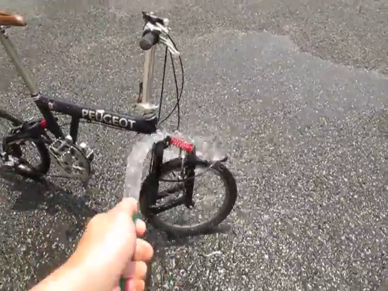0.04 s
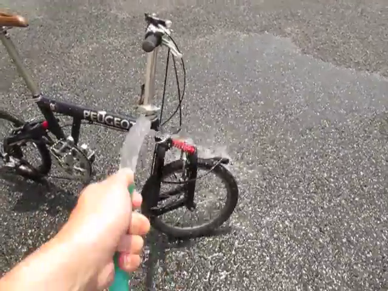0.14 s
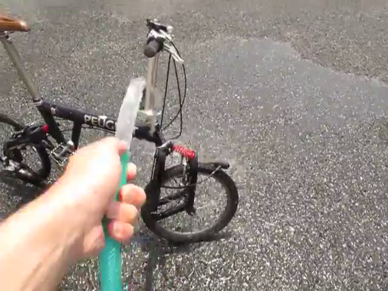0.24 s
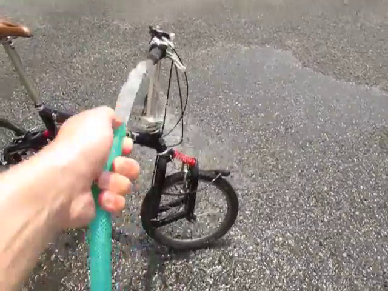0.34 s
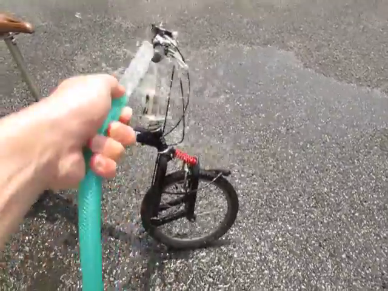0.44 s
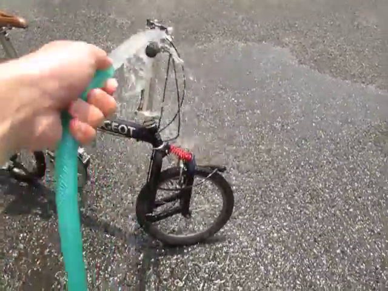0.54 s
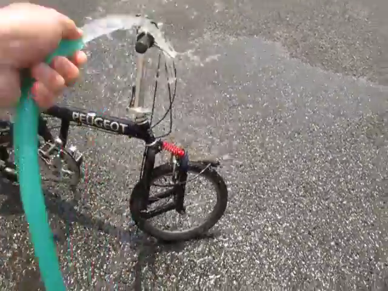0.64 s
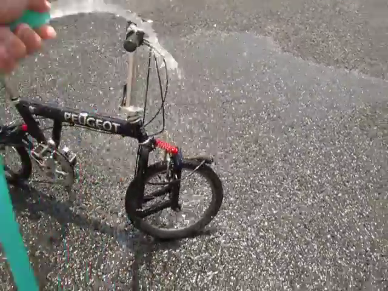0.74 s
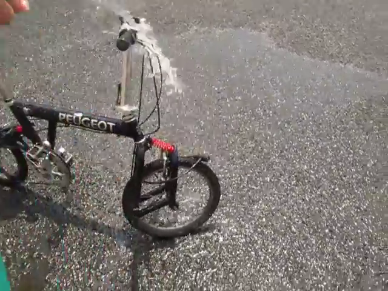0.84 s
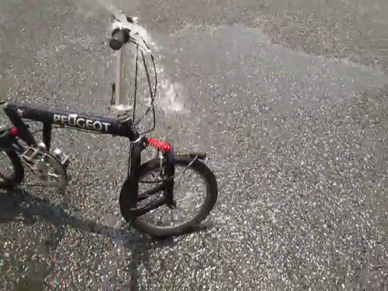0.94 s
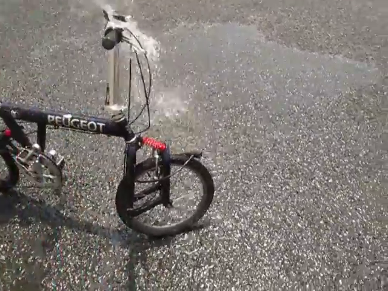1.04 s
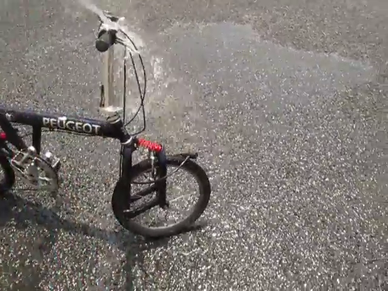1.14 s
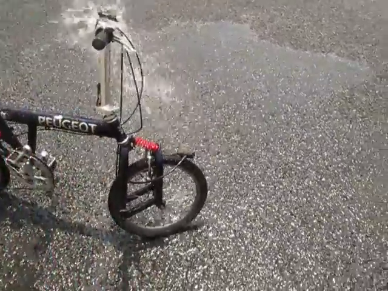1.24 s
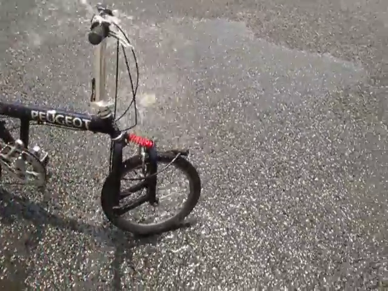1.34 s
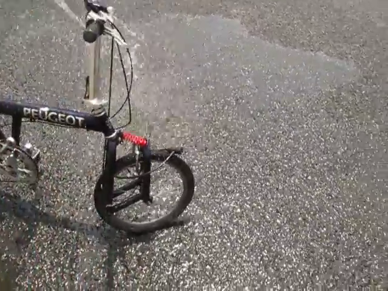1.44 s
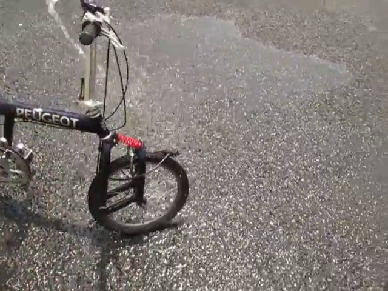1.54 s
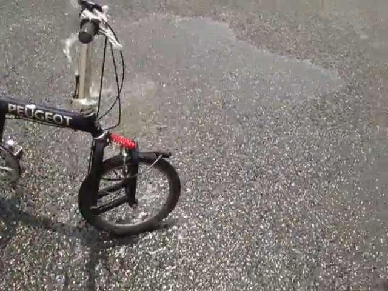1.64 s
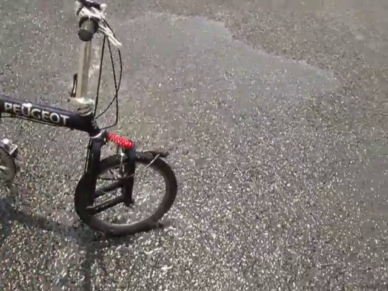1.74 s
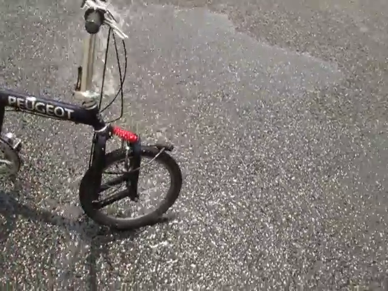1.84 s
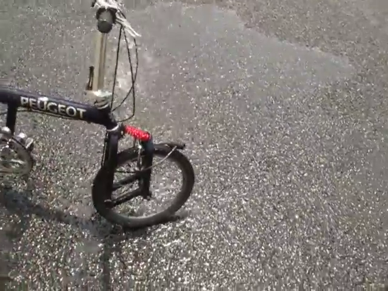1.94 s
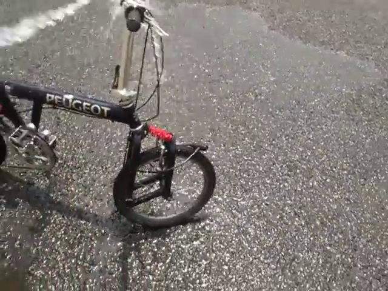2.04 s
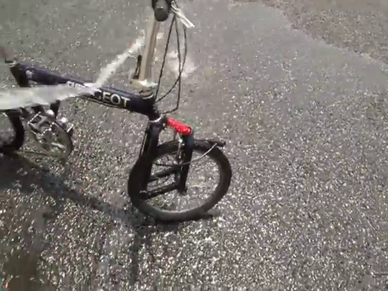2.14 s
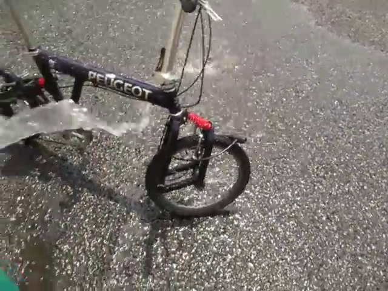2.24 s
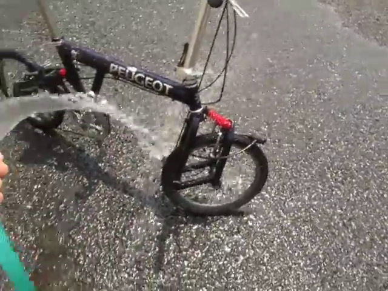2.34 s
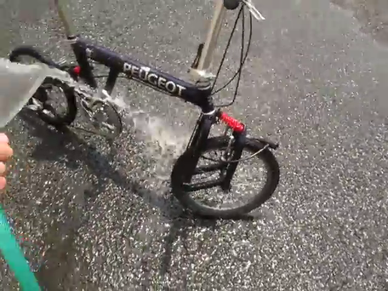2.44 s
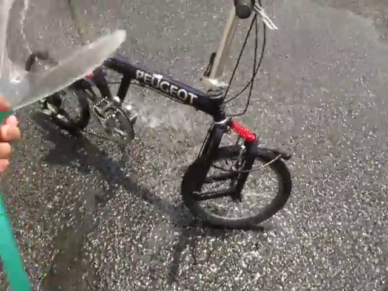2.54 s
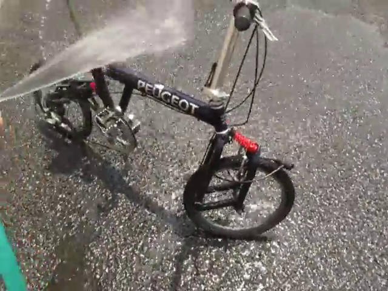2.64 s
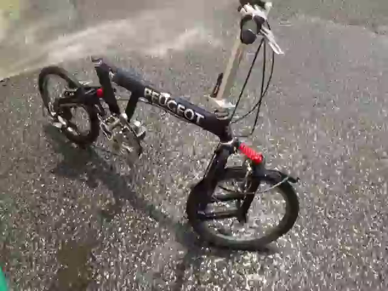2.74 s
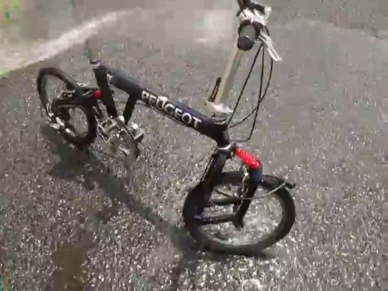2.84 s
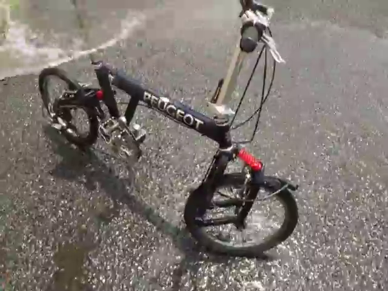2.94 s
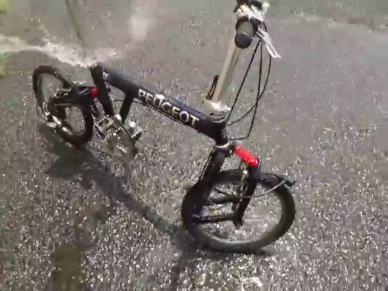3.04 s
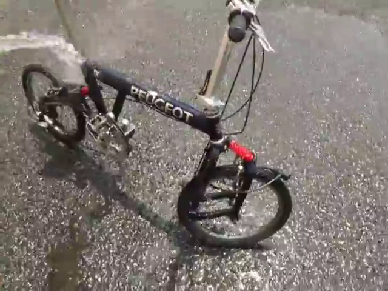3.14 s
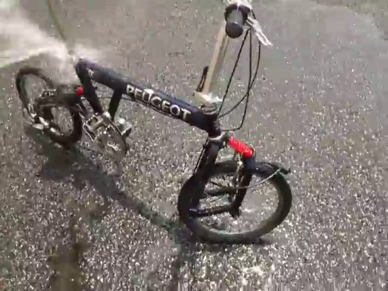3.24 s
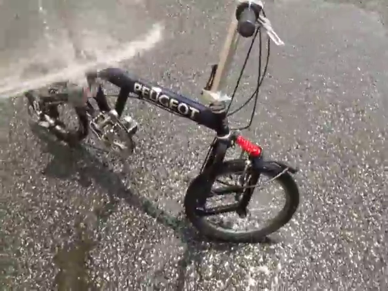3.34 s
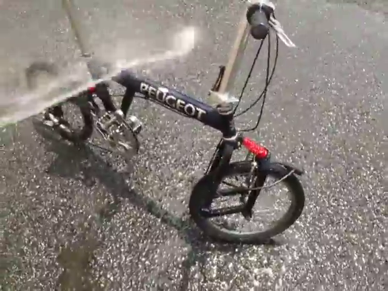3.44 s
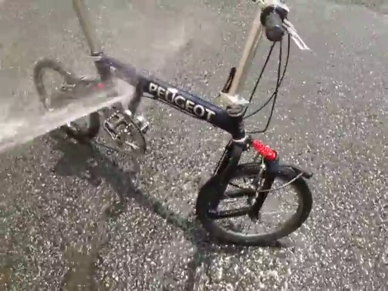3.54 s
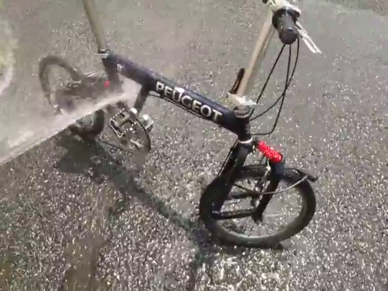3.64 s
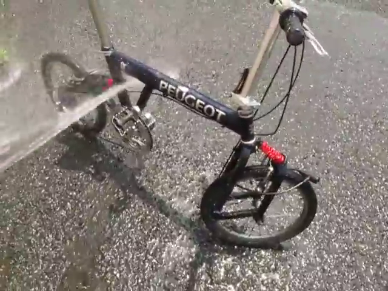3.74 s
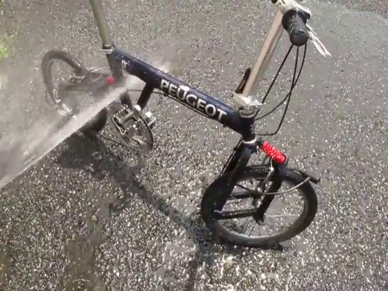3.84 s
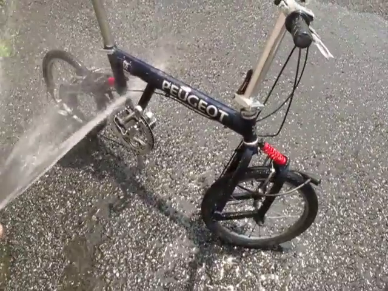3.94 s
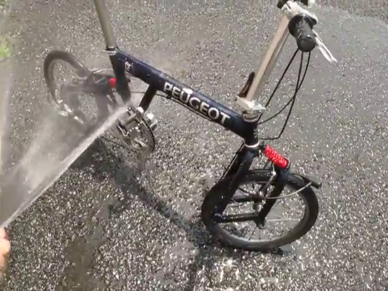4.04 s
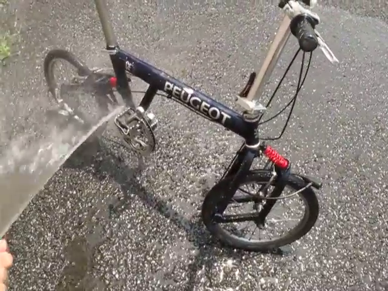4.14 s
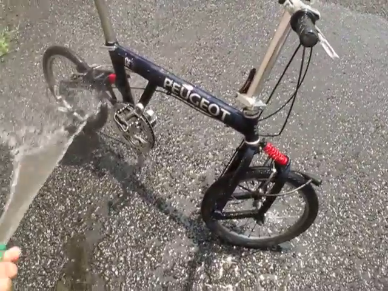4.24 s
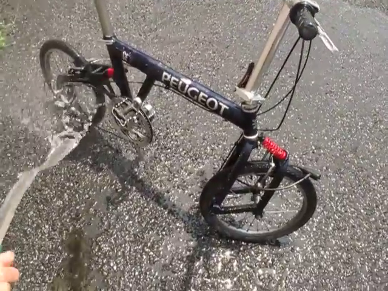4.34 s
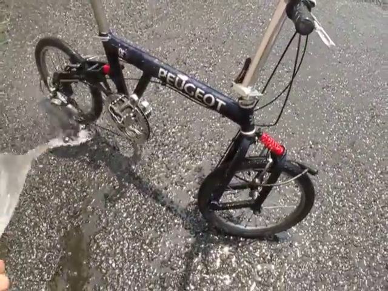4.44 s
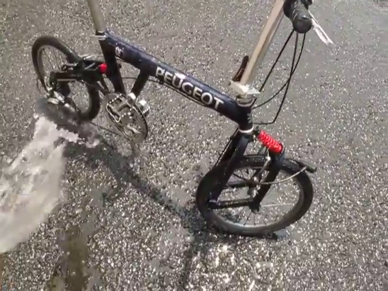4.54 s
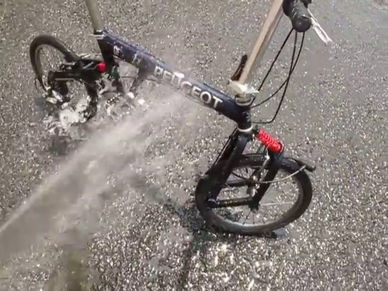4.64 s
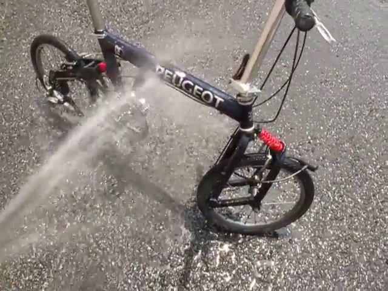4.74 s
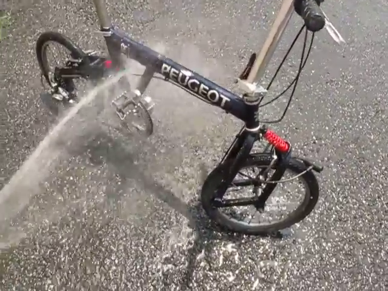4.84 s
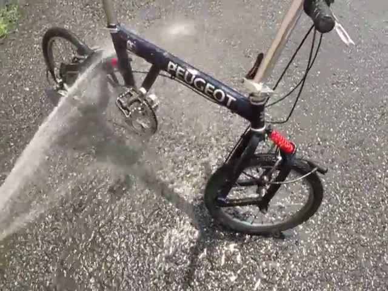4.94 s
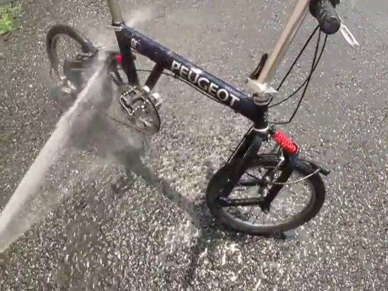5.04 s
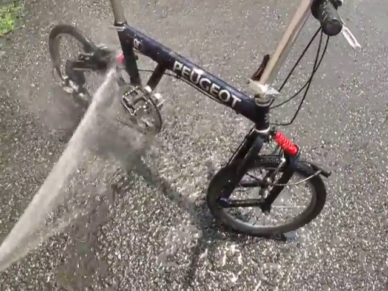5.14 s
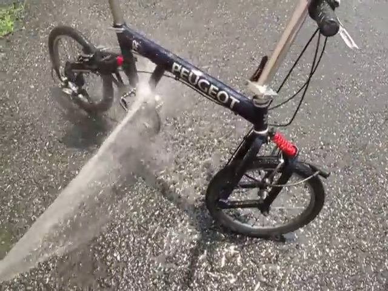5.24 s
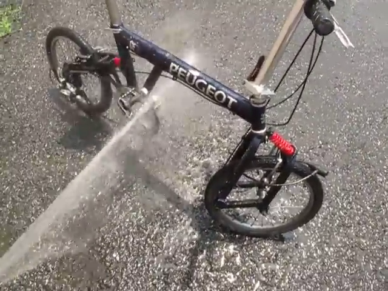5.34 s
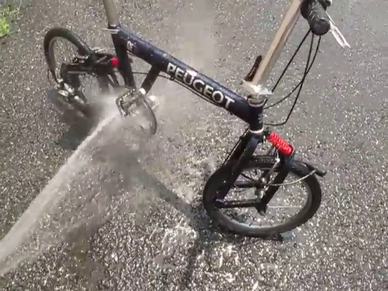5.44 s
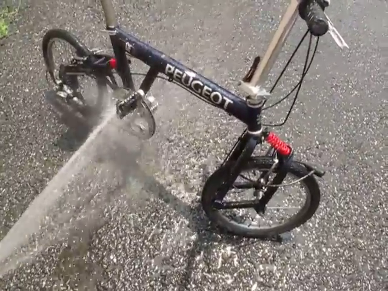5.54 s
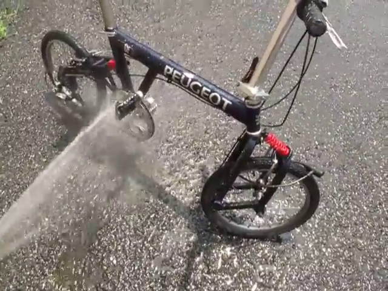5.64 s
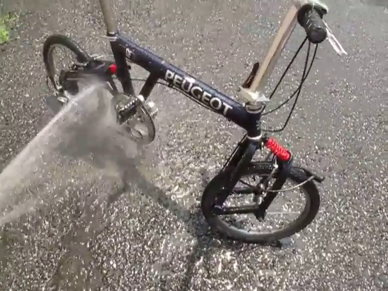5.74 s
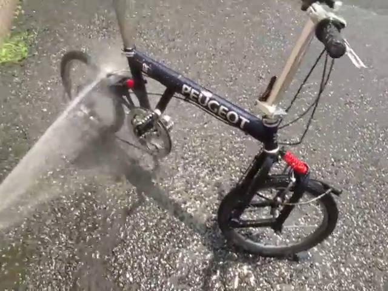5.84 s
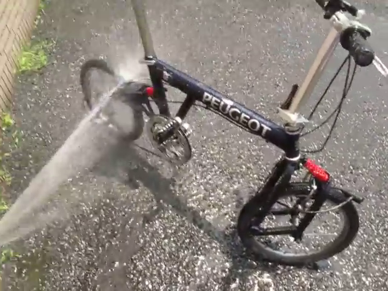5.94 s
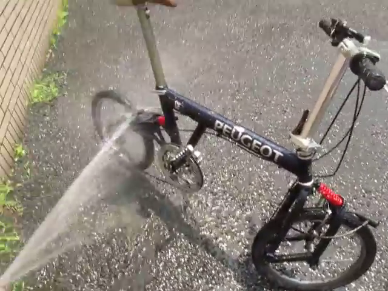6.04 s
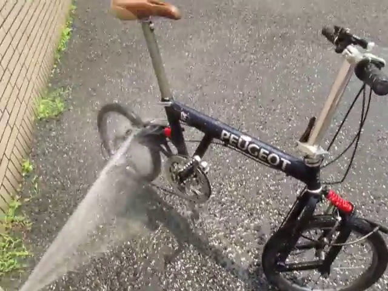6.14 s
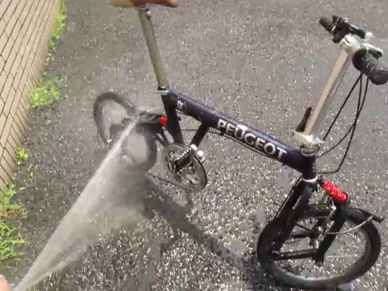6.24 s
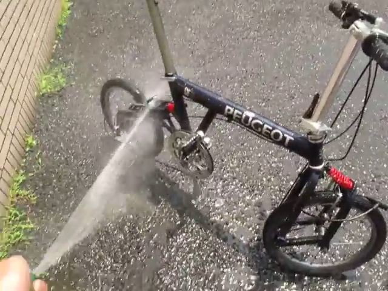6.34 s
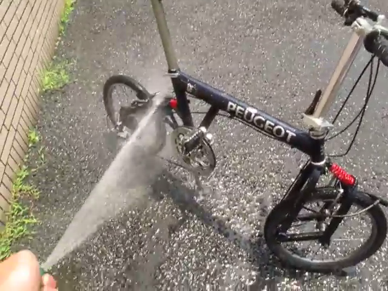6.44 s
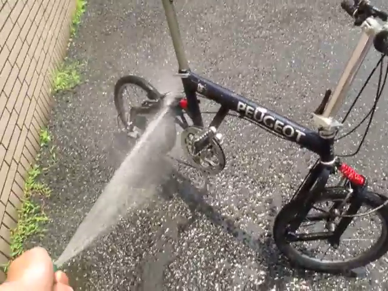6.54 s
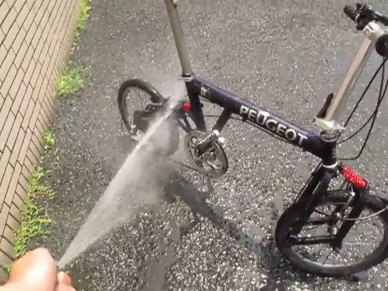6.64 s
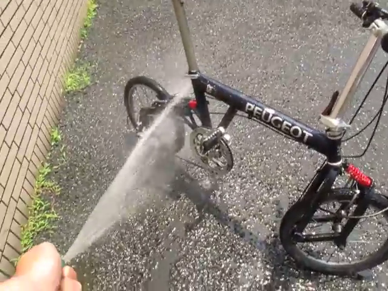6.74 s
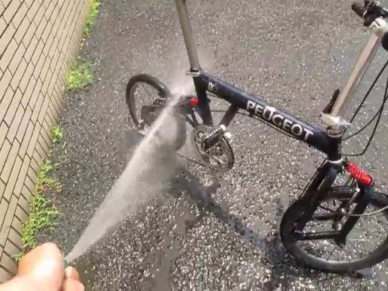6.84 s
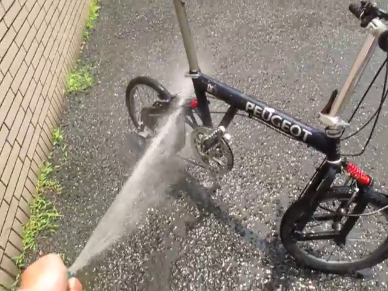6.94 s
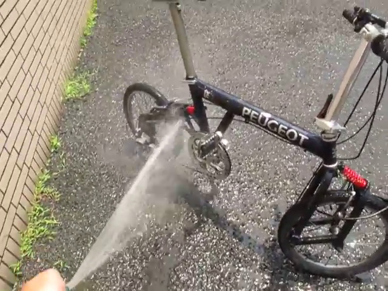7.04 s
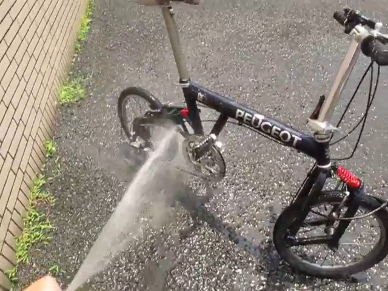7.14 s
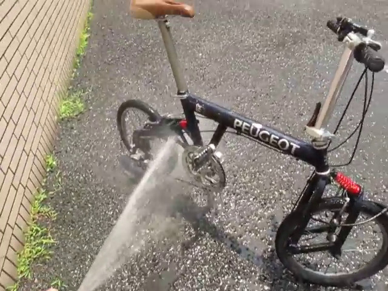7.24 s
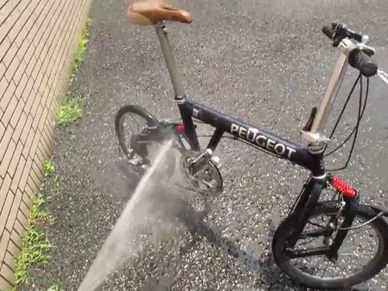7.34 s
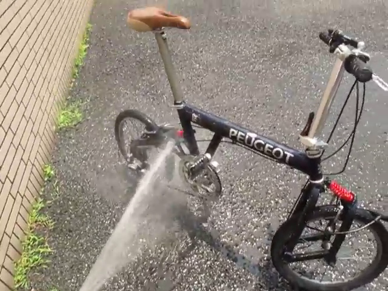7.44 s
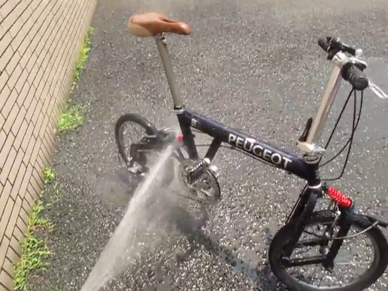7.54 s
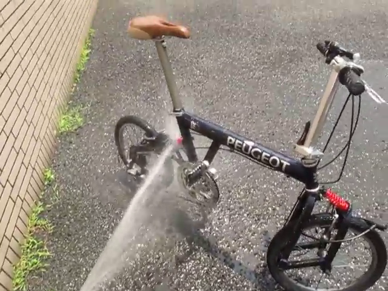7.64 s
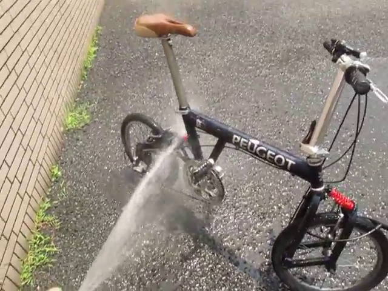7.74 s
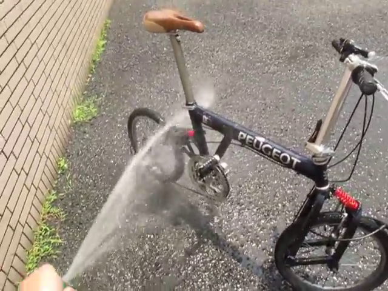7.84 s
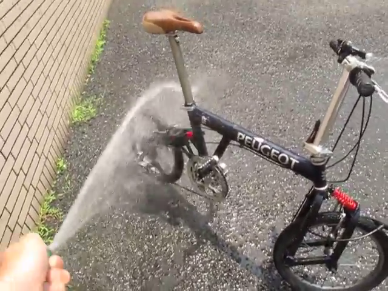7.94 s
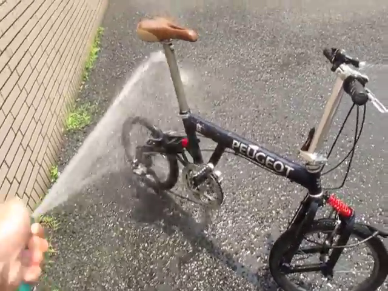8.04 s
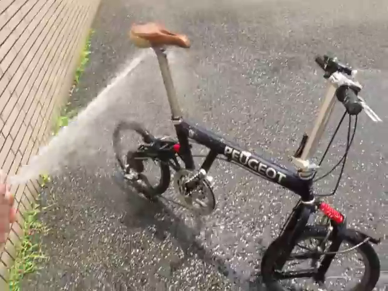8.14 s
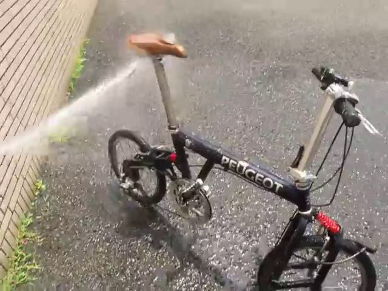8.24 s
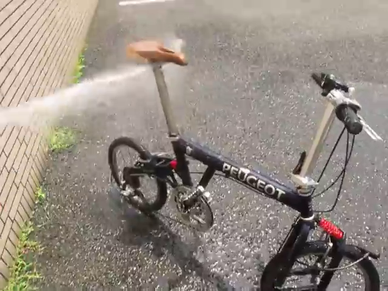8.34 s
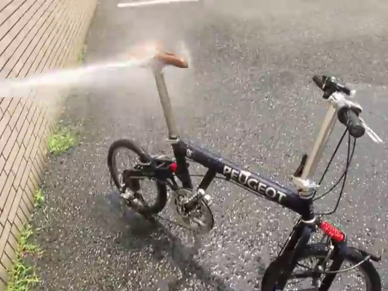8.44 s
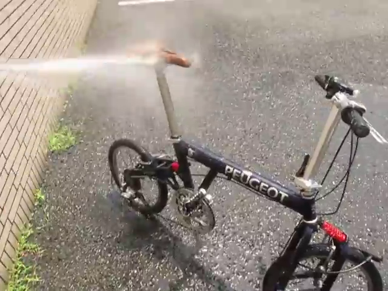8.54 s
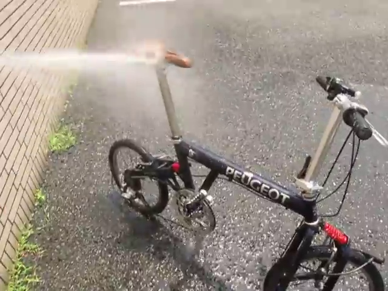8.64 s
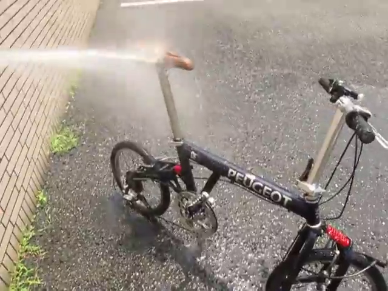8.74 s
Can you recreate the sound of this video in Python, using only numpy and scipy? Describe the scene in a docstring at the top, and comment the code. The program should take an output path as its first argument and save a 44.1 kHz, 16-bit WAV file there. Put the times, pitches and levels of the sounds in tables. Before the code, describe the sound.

A garden hose sprays a bicycle on wet asphalt, loose watery slaps turning to bright hissing spatter, finally drumming on the hollow saddle.

```python
"""Water bursts and patters throughout: a garden hose plays over a bicycle on wet asphalt, beside a quiet street.
A loose stream slaps in blobs; pinched by a thumb it hits more often and hisses. Both are made of random impacts,
turned into short decaying tones and bursts of noise. The jet drums on the frame, tyre, spokes and mudguard, and at
last the saddle, each a set of resonances. Run-off, puddles, breeze and street are filtered impacts, noise and hum."""
import sys
import numpy as np
from scipy import signal
from scipy.io import wavfile
from scipy.ndimage import uniform_filter1d

SR = 44100
rng = np.random.default_rng(int(sys.argv[2]) if len(sys.argv) > 2 else 0)


def bounce(signal):
    """Save signal as a 16-bit WAV file at the path given by the first command-line argument."""
    frames = np.transpose(np.atleast_2d(signal))
    limited = np.clip(frames, -1, 1)
    pcm = np.round(limited * 32767).astype(np.int16)
    wavfile.write(sys.argv[1], SR, pcm)


N = 387198
TIME = np.arange(N) / SR


def amp(db):
    """Decibels to gain."""
    return 10 ** (np.asarray(db) / 20)


def evened(x):
    """Scales to rms 1."""
    return x / np.sqrt(np.mean(x ** 2) + 1e-20)


def steadied(x, size=2200):
    """Holds the short-time rms near 1: a hose delivers water at an even rate."""
    power = abs(uniform_filter1d(uniform_filter1d(x ** 2, size), size))
    return x / np.sqrt(power + 1e-4 * np.mean(x ** 2))


def curve(rows, column=1):
    """One column of a table, joined by straight lines in time."""
    rows = np.asarray(rows)
    return np.interp(TIME, rows[:, 0], rows[:, column])


def add(mix, s, sound):
    """Adds a sound to the mix at a time in seconds."""
    part = mix[max(round(s * SR), 0):][:len(sound)]
    part += sound[:len(part)]


def colour(x, points, size=4096):
    """Causal filter with the given spectrum, so that clicks keep their sharp front."""
    hz, db = np.transpose(points)
    bins_hz = abs(np.fft.fftfreq(size, 1 / SR)) + 1
    log_gain = np.log(amp(np.interp(np.log(bins_hz), np.log(hz), db)))
    taps = np.fft.ifft(np.exp(np.conj(signal.hilbert(log_gain)))).real
    return signal.oaconvolve(x, taps[:size // 2])[:N]


def ring(x, modes):
    """Passes x through a set of damped resonances."""
    out = np.zeros(N)
    for hz, width, db in modes:
        r = np.exp(-np.pi * width / SR)  # a wider resonance dies sooner
        pole = r * np.exp(2j * np.pi * hz / SR)
        out += amp(db) * signal.lfilter([1 - r], [1, -pole], x).real
    return out


def noise():
    """Steady white noise."""
    return rng.standard_normal(N)


def signs():
    """A random plus or minus for every sample: impacts push or pull."""
    return rng.choice([-1, 1], N)


def drops(per_s, spread_db):
    """Impacts at random moments: many small, a few large."""
    size_db = spread_db * np.minimum(rng.exponential(1, N), 3.5)
    return (rng.random(N) < per_s / SR) * amp(size_db)


def linger(x, seconds):
    """Lets each impulse die away exponentially."""
    r = np.exp(-1 / (seconds * SR))
    return signal.lfilter([1 - r], [1, -r], x)


def wander(seconds):
    """A smooth random curve of rms 1."""
    return evened(linger(linger(noise(), seconds), seconds))


def swells(rows, steady_db):
    """Gain of a steady flow with smooth swells on top."""
    power = amp(steady_db) ** 2
    for s, length, db in rows:
        progress = np.clip((TIME - s) / length, 0, 1)
        power = power + (amp(db) * np.sin(np.pi * progress)) ** 2
    return np.sqrt(power)


def contact(rows, column=2, build_s=0.0049, drain_s=0.029, glancing_db=-2):
    """Gain while the jet crosses a part: it builds, is fullest halfway, and drains after the row's length."""
    power = np.zeros(N)
    for row in rows:
        start, length = row[:2]
        t = TIME[:round((length + 10 * drain_s) * SR)]
        off_centre = (2 * np.minimum(t / length, 1) - 1) ** 2
        envelope = np.minimum(t / build_s, 1) * np.exp(-np.maximum(t - length, 0) / drain_s)
        add(power, start, (amp(row[column] + glancing_db * off_centre) * envelope) ** 2)
    return np.sqrt(power)


def glance(x, delay_s, strength=0.3, sway_s=0.121):
    """An echo from a surface beside the impact; its delay sways with the aim and shifts the hiss's colour."""
    late = TIME - delay_s * np.exp(0.2 * wander(sway_s))
    # a wet, rough surface reflects only weakly
    return (x + strength * np.interp(late, TIME, x)) / np.sqrt(1 + strength ** 2)


# Hum of a distant machine. Each row: pitch in Hz, level in dB before the fade is added.
HUM = [(42, -68.5), (200, -63)]
# Its fade as the microphone turns away. Each row: time in seconds, change of level in dB.
HUM_FADE = [(0, 0.5), (2.5, 0.5), (4.5, -5.5), (6, -13)]


def hum():
    """Low sine tones whose pitch drifts by about 3 Hz."""
    drift, tones_sum = wander(0.045), np.zeros(N)
    for hz, db in HUM:
        turns = np.cumsum(hz + 3 * drift) / SR
        tones_sum += amp(db) * evened(np.sin(2 * np.pi * turns))
    return amp(curve(HUM_FADE)) * tones_sum


# Colour of the street rumble. Each row: frequency in Hz, relative strength in dB per Hz.
STREET = [(60, -11.5), (130, -5.5), (250, -5), (450, -8.5), (800, -12), (2000, -27), (8000, -48)]


def street():
    """The steady rumble of the street: noise, strongest in the bass."""
    return amp(-56.5) * evened(colour(noise(), STREET))


# Colour of the breeze. Each row: frequency in Hz, relative strength in dB per Hz.
BREEZE = [(15, -14), (28, -2.5), (42, 5), (70, -4.5), (130, -14), (300, -32), (2000, -60)]
# Gusts on the microphone. Each row: start in seconds, length in seconds, level at the fullest in dB.
GUSTS = [(3.4, 2.2, -63), (6.1, .55, -52), (7.7, 0.6, -55)]


def breeze():
    """Very low noise from moving air, steady with gusts on top."""
    return swells(GUSTS, steady_db=-59.5) * evened(colour(noise(), BREEZE, size=16384))


# Colour of the run-off. Each row: frequency in Hz, relative strength in dB per Hz.
RUNOFF = [(100, -18), (400, -5), (1000, -5), (2000, 3.5), (4000, 3), (9000, -11.5), (12000, 2),
          (16000, -10)]


def runoff():
    """Run-off patters on the asphalt: thousands of small impacts a second."""
    return amp(-47.0) * evened(colour(drops(3000, spread_db=3.5) * signs(), RUNOFF))


# Run-off pouring into puddles. Each row: start in seconds, length in seconds, level at the fullest in dB.
POURS = [(2.5, 0.47, -52.5), (3.2, 0.67, -49), (5.0, 0.85, -51.5), (6.6, 0.44, -49), (7.8, .8, -49)]


def puddles():
    """A steady trickle with fuller pours: impacts with a low, plopping colour."""
    plop = [(100, -14.5), (260, -2), (450, -0.5), (620, -6), (850, 0.0), (2000, -13.5), (8000, -57)]  # Hz, dB
    return swells(POURS, steady_db=-55) * evened(colour(drops(1200, spread_db=4.0) * signs(), plop))


# Stray drops that knock on something hard close by. Each row: time in seconds, peak level in dB.
KNOCKS = [(3.476, -25), (3.844, -19), (5.78, -37)]


def knocks(decay_s=0.00075, size=600):
    """A stray drop knocks close by: a dull push, which swings back and dies away."""
    u, out = np.arange(size) / SR / decay_s, np.zeros(N)
    for s, db in KNOCKS:
        add(out, s, amp(db) * (1 - u) * np.exp(-u))
    return out


# Gurgles and whistles of the water. Each row: start in seconds, length in seconds, pitch in Hz,
# level at the fullest in dB.
TONES = [(0.492, 0.087, 4930, -40.5), (1.385, 0.3, 4020, -53), (3.188, .014, 3230, -32),
         (3.414, 0.011, 3500, -32), (3.452, 0.079, 2195, -35), (3.495, 0.058, 1950, -37)]


def tones(waver_hz=45, waver_s=0.001):
    """Brief fuzzy sine tones that waver in pitch, swell and fade."""
    out, waver = np.zeros(N), waver_hz * wander(waver_s)
    for s, length, hz, db in TONES:
        turns = np.cumsum(hz + waver[round(s * SR):][:max(round(length * SR), 8)]) / SR
        swell = signal.windows.hann(len(turns))
        add(out, s, amp(db) * swell * np.sqrt(2) * np.sin(2 * np.pi * turns))
    return out


def drumming(aim, modes, per_s, spread_db, crack=0.25):
    """The jet beats on a ringing part while it is aimed at it; each beat starts with a crack."""
    blows = drops(per_s, spread_db) * signs()
    cracks = colour(blows, [(500, 7), (3000, 6), (9000, -21), (15000, -28)])  # Hz, dB
    beats = evened(ring(blows, modes)) + crack * evened(cracks)
    # a small part radiates little below its lowest mode
    low_cut = signal.butter(3, 0.94 * modes[0][0], "high", fs=SR, output="sos")
    beats = signal.sosfilt(low_cut, beats)
    return contact(aim, build_s=0.03, drain_s=0.039) * steadied(beats)


# Jet on the frame. Each row: start in seconds, length in seconds, level at the fullest in dB.
ON_FRAME = [(1.645, 0.057, -36.5), (1.815, 0.046, -38.5), (2.095, 0.055, -43), (2.68, 0.18, -46),
            (4.71, 0.054, -41), (5.125, 0.076, -35.5), (5.37, .41, -44.5), (6.45, 1.29, -45.5)]
# What the frame rings with. Each row: pitch in Hz, width in Hz, relative level in dB.
FRAME = [(830, 150, -1.7), (1020, 270, 0.26), (1640, 240, -1), (1910, 180, -1)]


def frame():
    """The frame rings in a few broad resonances that die quickly."""
    return drumming(ON_FRAME, FRAME, per_s=400, spread_db=2)


# Jet on the rear tyre. Each row: start in seconds, length in seconds, level at the fullest in dB.
ON_TYRE = [(5.835, 0.46, -37), (6.275, 0.095, -34)]
# What the tyre rings with. Each row: pitch in Hz, width in Hz, relative level in dB.
TYRE = [(425, 32, 2), (810, 100, -17), (984, 95, -0.5), (1150, 150, -0.5), (1900, 300, -0.5),
        (2190, 200, -2), (3090, 100, -10)]


def tyre():
    """The hollow tyre answers dense, even blows, with a low resonance at the bottom."""
    return drumming(ON_TYRE, TYRE, per_s=2500, spread_db=1.5)


# Jet on the spokes. Each row: start in seconds, length in seconds, level at the fullest in dB.
ON_SPOKES = [(5.05, .2, -38), (6.5, .12, -34), (7.0, 0.08, -31.5), (7.33, .38, -31)]
# What the spokes ring with. Each row: pitch in Hz, width in Hz, relative level in dB.
SPOKES = [(5500, 290, 10), (5630, 300, -1), (6250, 240, -22), (7800, 500, 3)]


def spokes():
    """The spokes ring high under very uneven blows."""
    return drumming(ON_SPOKES, SPOKES, per_s=1100, spread_db=11)


# Jet on the mudguard. Each row: start in seconds, length in seconds, level at the fullest in dB.
ON_MUDGUARD = [(7.41, 0.2, -33.5)]
# What the mudguard rings with. Each row: pitch in Hz, width in Hz, relative level in dB.
MUDGUARD = [(846, 40, -3), (1376, 34, -1), (1920, 50, -7), (2500, 120, -7.5), (3110, 110, -10)]


def mudguard():
    """The mudguard rings longest in its two lowest, narrow resonances."""
    return drumming(ON_MUDGUARD, MUDGUARD, per_s=940, spread_db=4.0)


# Jet on the saddle. Each row: start in seconds, length in seconds, level at the fullest in dB.
ON_SADDLE = [(8.21, 0.11, -38.5), (8.395, .16, -22.5), (8.58, 0.23, -22.5)]
# What the saddle rings with. Each row: pitch in Hz, width in Hz, relative level in dB.
SADDLE = [(827, 55, 0.5), (910, 125, 3), (1276, 46, 8), (1560, 88, 4), (1740, 150, 8.5), (2110, 91, 10.5),
          (2520, 120, 8.5), (2940, 130, 6.5), (3360, 55, 7.5), (3890, 97, -5), (4270, 55, -14)]


def saddle():
    """The hollow saddle drums in many resonances at once."""
    return drumming(ON_SADDLE, SADDLE, per_s=990, spread_db=1.5)


def slap(hz, echo_s, cycles=0.75, echo=0.35, size=700):
    """One blob flattens: a pressure spike, a few dying cycles, and its echo from the asphalt; energy 1."""
    t = np.arange(size) / SR
    pulse = np.exp(-t * hz / cycles) * np.cos(2 * np.pi * hz * t)
    pulse = pulse + echo * np.interp(t - echo_s, t, pulse, left=0)
    return pulse / np.linalg.norm(pulse)


def snaps(per_s=70, size_db=10):
    """Now and then a fast drop meets a bare surface with one very short crack."""
    cracks = signs() * drops(per_s, spread_db=3.5)
    return amp(size_db) * colour(cracks, [(200, -24), (1000, -15.5), (3000, 1), (10000, -21), (15000, -16)])


# Colour of splashing water. Each row: frequency in Hz, relative strength in dB per Hz.
SPLASH = [(100, -58), (400, -19.5), (1000, -15.5), (1700, -15.5), (2500, -8.5), (4000, -6), (6000, -2),
          (8000, 0.36), (10200, 1.5), (13000, -14), (15800, -25.5)]


def splashing(hits, pinch, patchy_db=4):
    """Each impact bursts into droplets with a colour of its own; more droplets fall back after it."""
    edges_hz = [100, 3000, 5500, 8500, 11500, 17000]
    bands = []
    for band in zip(edges_hz, edges_hz[1:]):
        patchy = amp(patchy_db * rng.uniform(-np.sqrt(3), np.sqrt(3), N))
        power = (hits * patchy) ** 2
        burst = linger(power, 0.00098) + 0.43 * linger(power, 0.007)
        band_pass = signal.butter(3, band, "band", fs=SR, output="sos")
        bands.append(signal.sosfilt(band_pass, np.sqrt(burst) * noise()))
    mist = amp(5 * (pinch + 0.5)) * bands[-1]  # a faster jet makes finer, brighter droplets
    ticks = drops(1300, spread_db=5.5) * signs()  # single droplets on a hard surface
    spray = colour(evened(sum(bands[:-1]) + mist) + 0.64 * evened(ticks), SPLASH)
    return steadied(glance(glance(spray, delay_s=0.000702), delay_s=0.003))


# The largest blobs hitting the bicycle. Each row: time in seconds, slap in dB, pitch of the slap in Hz,
# splash in dB; both levels are taken over one millisecond, before the lift and colouring below.
BLOBS = [(0.2292, -22, 2840, -19), (0.2918, -23, 2660, -16), (0.5763, -36, 3560, -15),
         (0.5944, -24.5, 2970, -26), (0.6306, -19, 2260, -36), (0.7172, -26.5, 3110, -19),
         (0.8068, -21.5, 2080, -25), (1.089, -20, 3080, -17), (1.2905, -25, 3340, -15),
         (1.3264, -17, 2820, -32), (1.68, -23.5, 1800, -24), (1.785, -24, 4270, -18),
         (1.807, -23, 2740, -18), (1.843, -13, 2570, -24), (1.8775, -21, 3730, -25),
         (1.8922, -19.5, 3090, -33), (1.9635, -25, 3130, -17), (2.0185, -18, 2060, -30),
         (2.0344, -38, 3420, -15.5), (2.067, -30, 3890, -23), (2.0978, -30, 2940, -10.5),
         (2.124, -13, 2380, -22), (2.1601, -18, 3530, -29), (2.1956, -20, 3010, -14),
         (2.324, -21.5, 1770, -17), (2.3326, -22, 3390, -13), (2.3501, -17.5, 2700, -10.5),
         (2.4226, -19.5, 2030, -30), (2.4482, -14.5, 3500, -25), (2.5726, -30, 3310, -11.5),
         (2.7653, -20, 3060, -18), (3.0577, -23, 4000, -21), (3.207, -27, 3670, -11.5),
         (3.2592, -22, 3000, -22), (3.464, -32, 2290, -17), (3.7565, -38, 3840, -12),
         (3.846, -17, 3970, -8), (4.355, -46, 4050, -18), (4.4824, -34, 3960, -15), (4.611, -19, 2440, -19),
         (4.7121, -20, 2540, -21), (4.9072, -39, 3360, -9.5), (5.272, -37, 3820, -10.5),
         (5.3416, -20, 3830, -19), (5.6472, -17.5, 3690, -21), (5.6887, -20, 3440, -26),
         (5.774, -18.5, 3530, -22), (5.9825, -19, 4200, -25), (6.447, -23, 4090, -12),
         (7.944, -19, 2710, -17)]


def blobs(splash_s=0.0022, scatter_s=0.0044, scatter=0.13, size=700):
    """The largest blobs: a slap with a splash of decaying noise on top."""
    t, slaps, splashes = np.arange(size) / SR, np.zeros(N), np.zeros(N)
    for s, slap_db, hz, splash_db in BLOBS:
        add(slaps, s, amp(slap_db) * slap(hz, rng.uniform(0.003, 0.0038), cycles=0.96, echo=0.42))
        decay = np.exp(-t / splash_s) + scatter * np.exp(-t / scatter_s)
        spray = rng.standard_normal(size) * decay
        add(splashes, s, amp(splash_db) * spray / np.linalg.norm(spray))
    body = [(200, -22), (700, -1.5), (1500, 2.0), (4000, 2.5), (7000, 5.5), (15000, -21)]  # Hz, dB
    samples_per_ms = SR / 1000
    return np.sqrt(samples_per_ms) * (colour(slaps, body) + amp(3) * colour(splashes, SPLASH))


# Spray that misses and lands on the asphalt. Each row: time in seconds, level in dB before the tilt below.
ON_ASPHALT = [(0, -39), (1.55, -38.5), (2.65, -34), (3.0, -37.5), (3.15, -30), (3.43, -30.5), (3.7, -27),
              (4.26, -27), (4.42, -35), (4.9, -30), (5.4, -26.5), (6.65, -25.5), (6.8, -25), (7.72, -29.5),
              (7.81, -29), (8.18, -33), (8.78, -28.5)]
# Flat ground gives a thinner splash than the bicycle. Each row: frequency in Hz, change in dB.
ASPHALT_TILT = [(500, -8), (1500, 1.5), (3000, 0), (6000, -2), (10000, .5), (14000, 2)]


def jet_on_asphalt(pinch):
    """Spray that misses splashes on the ground, denser when pinched, with occasional snaps at a steady rate."""
    misses = drops(500 * 4 ** pinch, spread_db=4.5)
    return amp(curve(ON_ASPHALT)) * colour(splashing(misses, pinch) + snaps(), ASPHALT_TILT)


def surging(pinch, loose_db=4.5, pinched_db=0.65, surge_s=0.0057):
    """The stream comes in uneven gulps with gaps between, most of all when loose; the mean flow stays."""
    depth_db = loose_db + (pinched_db - loose_db) * pinch
    return steadied(amp(depth_db * np.tanh(2 * wander(surge_s))))


# Colour of slapping water. Each row: frequency in Hz, relative strength in dB per Hz.
SLAP = [(100, -38), (400, -16), (700, -12), (1200, -7), (2000, -3), (3200, 1), (5000, 2), (8000, -6),
        (15000, -25)]


def slapping(hits, count=24):
    """Every blob slaps at one of several pitches, and trapped air bubbles plip."""
    trapped_air = drops(170, spread_db=6.5)
    kind, slaps, plips = rng.integers(0, count, N), np.zeros(N), np.zeros(N)
    for k, hz in enumerate(np.geomspace(1600, 5000, count)):
        echo_s = rng.uniform(0.0019, 0.004)
        chosen = kind == k
        slaps += signal.oaconvolve(hits * chosen, slap(hz, echo_s, cycles=1.2, echo=0.58))[:N]
        # small bubbles ring longer
        plips += signal.oaconvolve(trapped_air * chosen, slap(hz, echo_s, cycles=5.5, echo=0.21))[:N]
    wet = colour(evened(slaps) + 0.38 * evened(plips), SLAP)
    return steadied(glance(wet, delay_s=0.001606))


# The jet sweeps onto the bicycle and off again. Each row: start in seconds, length in seconds,
# fine spray at the fullest in dB, slapping water at the fullest in dB.
SWEEPS = [(0.0, .17, -30, -39), (0.225, 0.11, -29, -37.5), (0.525, .09, -31, -41),
          (0.745, 0.09, -35.5, -41.5), (0.965, .15, -27.5, -35), (1.13, 0.14, -31, -40),
          (1.275, 0.15, -29.5, -34.5), (1.65, 0.11, -29.5, -32), (1.785, .19, -30.5, -32),
          (1.99, .27, -31, -34.5), (2.32, .26, -25.5, -33), (2.76, 0.08, -30.5, -43),
          (3.045, 0.069, -26.5, -46), (3.17, 0.049, -39, -46), (3.3, .07, -27.5, -33),
          (3.46, 0.05, -21.5, -33.5), (3.58, 0.064, -25.5, -52), (3.77, 0.13, -25.5, -33),
          (3.895, 0.32, -25, -55), (4.525, 0.33, -25.5, -32), (4.91, 0.071, -25.5, -39.5),
          (5.01, 0.22, -23.5, -39.5), (5.268, 0.015, -22, -45), (5.372, 0.061, -22, -31),
          (5.49, 0.31, -24.5, -35.5), (5.845, 0.77, -26, -50), (6.94, 0.82, -24.5, -42),
          (7.87, 0.14, -28.5, -33), (8.25, 0.19, -32, -46), (8.385, 0.054, -24, -31),
          (8.46, 0.28, -27, -32.5)]


def jet_on_bicycle(pinch, loose_snap_db=5, bunching_db=2.0):
    """Every blob slaps and splashes; pinching makes the hits more frequent and the snaps weaker."""
    bunching = amp(bunching_db * wander(0.0019))  # the stream bunches in flight
    hits = bunching * drops(400 * 5 ** pinch, spread_db=4.0)
    spray = splashing(hits, pinch) + amp(loose_snap_db * (1 - pinch)) * snaps()
    water = contact(SWEEPS, column=2) * spray + contact(SWEEPS, column=3) * slapping(hits)
    return surging(pinch) * water


# Thumb on the hose end. Each row: time in seconds, pinch from 0 (loose blobs) to 1 (fine spray).
PINCH = [(0, 0.18), (2.2, 0.066), (2.5, 0.42), (3.2, 0.22), (4.1, 0.82), (4.45, 0.088), (4.8, 0.97),
         (5.6, .58), (7.6, 0.93), (7.9, 0.5), (8.78, 0.53)]


def jet():
    """One thumb shapes both the water on the bicycle and the spray that misses it."""
    pinch = np.clip(curve(PINCH), 0, 1)
    return jet_on_asphalt(pinch) + jet_on_bicycle(pinch)


def scene():
    """All the water and the street, heard from beside the bicycle."""
    background = hum() + street() + breeze() + runoff() + puddles()
    bicycle = frame() + tyre() + spokes() + mudguard() + saddle()
    return (background + knocks() + tones() + bicycle + blobs() + jet())[None]


def record(dry, notch_hz=11830, notch_width_hz=1900, ceiling=0.66, edge_hz=15900):
    """The microphone rounds off the sharpest peaks and has a deep treble notch; then the band limit."""
    rounded = dry / np.sqrt(np.sqrt(1 + np.square(np.square(dry / ceiling))))
    heard = signal.lfilter(*signal.iirnotch(notch_hz, notch_hz / notch_width_hz, SR), rounded)
    band_limit = signal.firwin(511, edge_hz, window=("kaiser", 9), fs=SR)
    return signal.oaconvolve(heard, band_limit[None], "same")


dry = scene()
out = record(dry)
bounce(out)
```